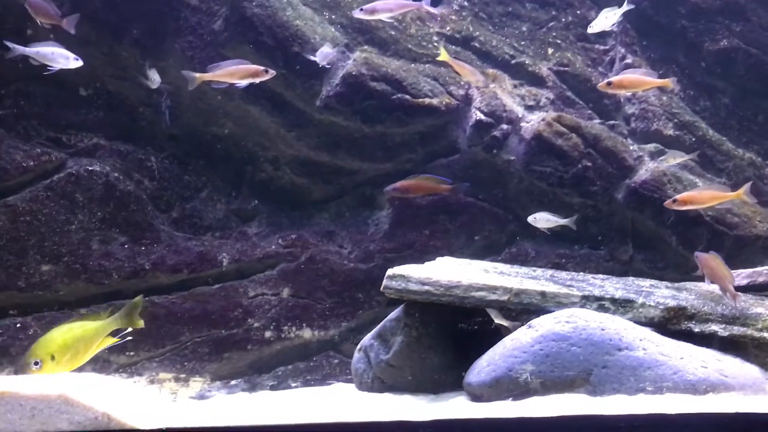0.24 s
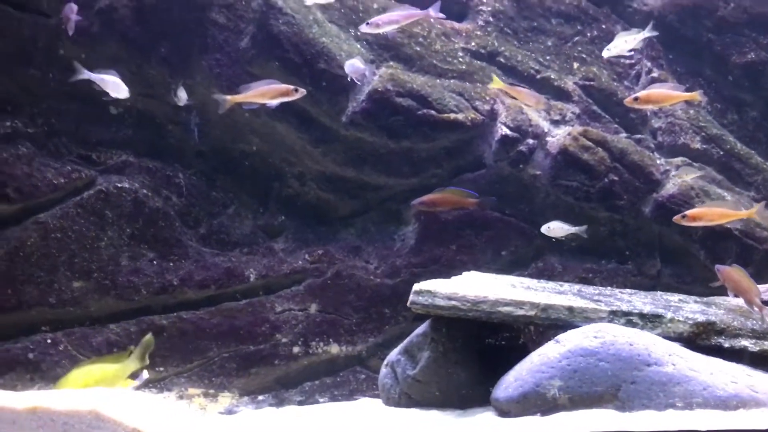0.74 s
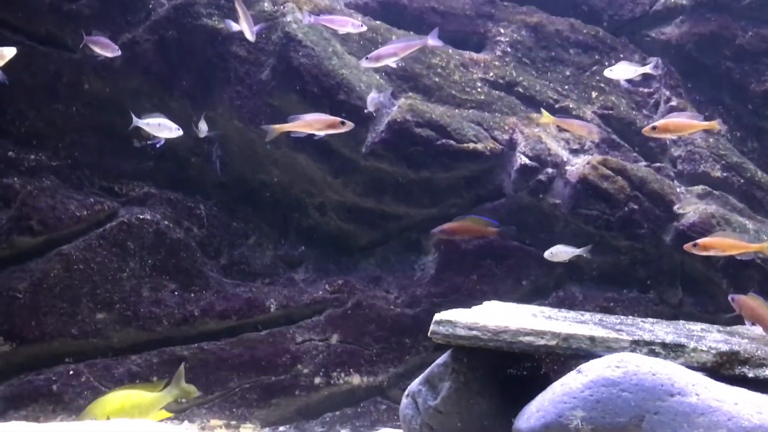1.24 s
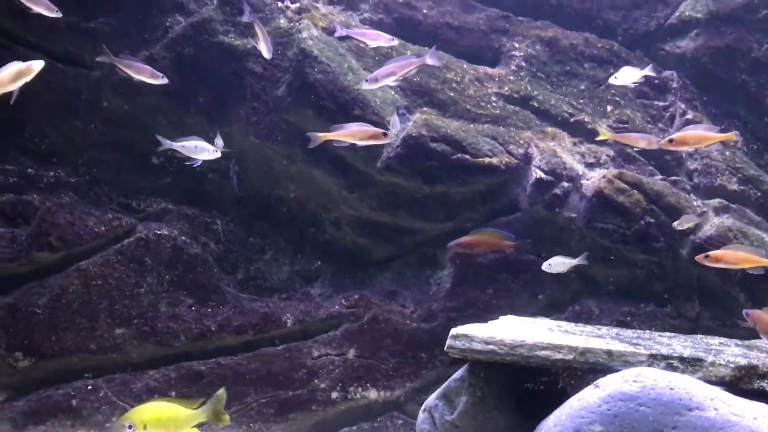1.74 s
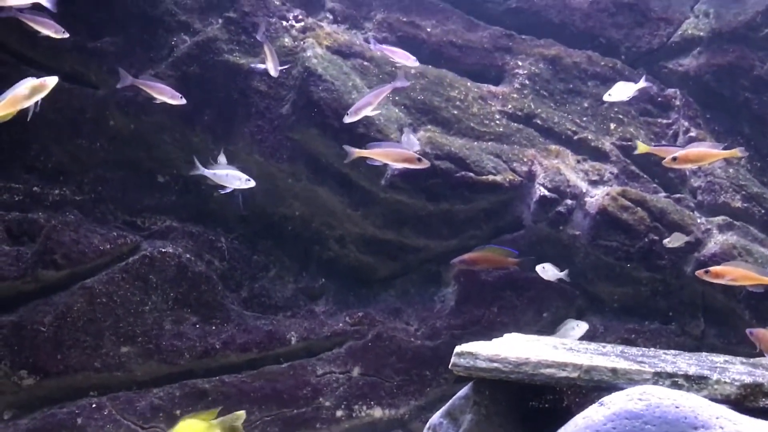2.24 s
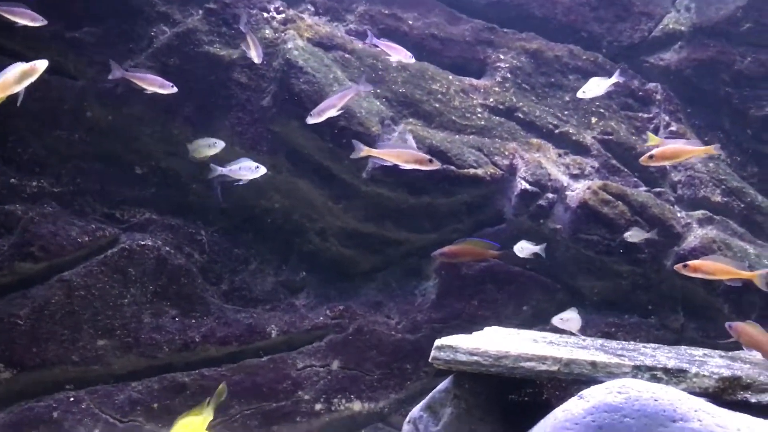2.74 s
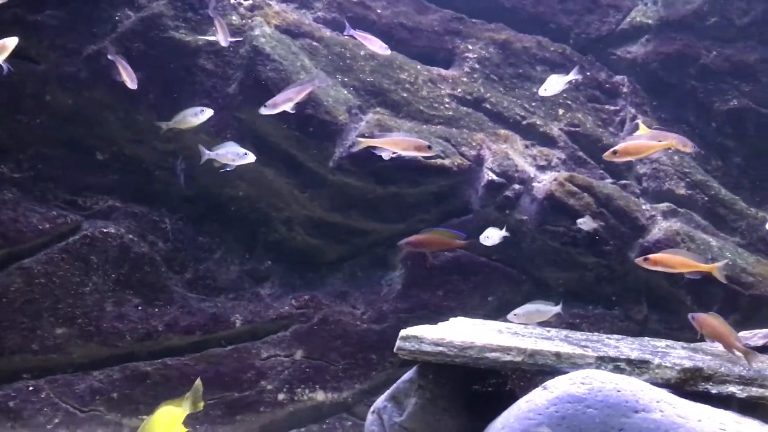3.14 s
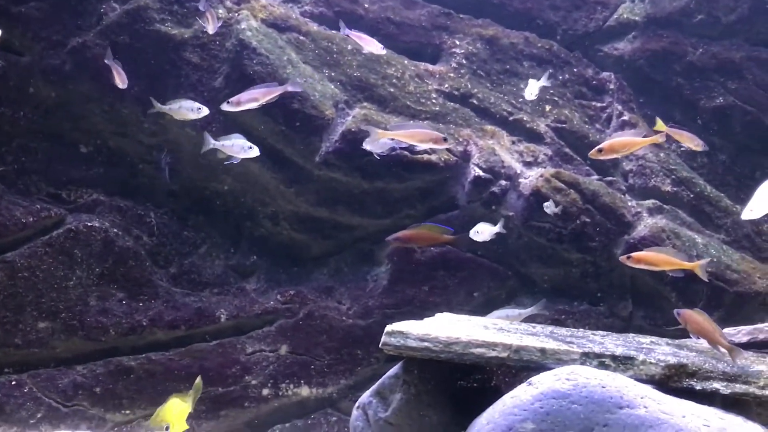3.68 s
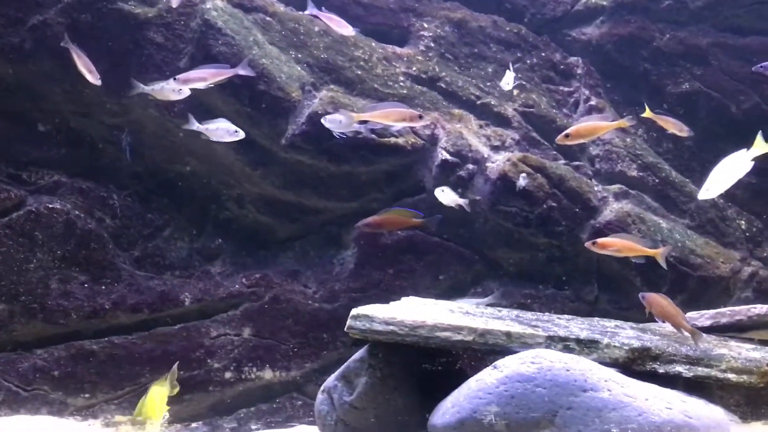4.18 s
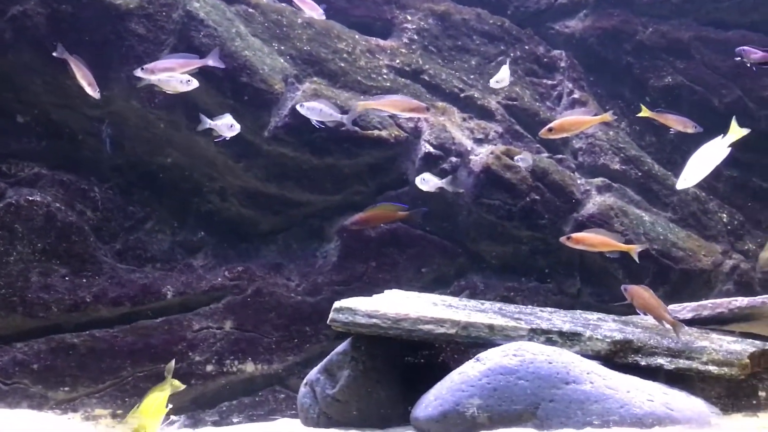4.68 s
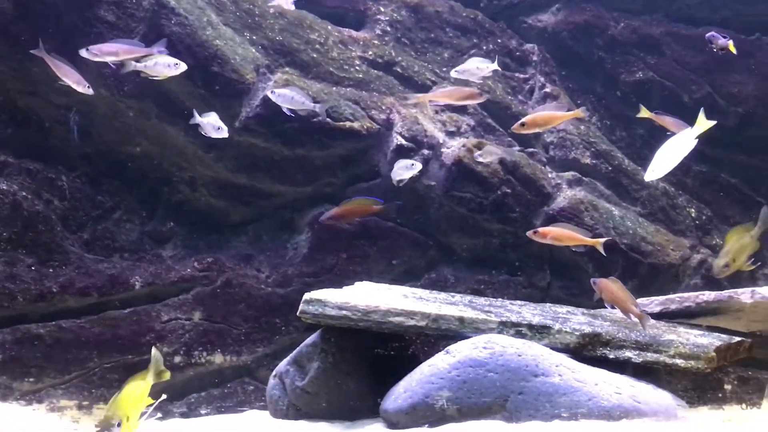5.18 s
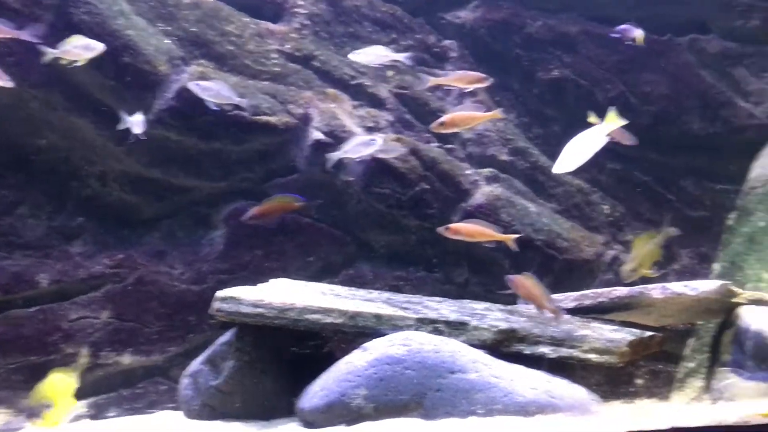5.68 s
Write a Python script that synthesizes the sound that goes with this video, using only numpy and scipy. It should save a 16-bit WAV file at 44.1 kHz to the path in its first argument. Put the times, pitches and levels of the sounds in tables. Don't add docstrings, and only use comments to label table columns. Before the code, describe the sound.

A close mono indoor sound of a fish tank, continuous from start to end. A deep, steady 50-hertz pump hum is the strongest layer, with a faint drone and cabinet resonance. Above it, filter water makes a quiet fizzing hiss, slightly stronger around 0.5 seconds and gently wavering afterwards. Irregular bubble ticks and high plinks dot it, with bright ones near 1.1 seconds and a busy cluster from 2.5 to 3.1, the sharpest at 2.9. Drops slap the surface at about 0.1, 1.7, 2.6, 3.0 and, most clearly, 4.4 to 4.5 seconds, with lower plinks around the last. Soft gurgles bunch between 0.5 and 3 seconds, then thin out, returning near 4, 5 and 5.8. A faint hollow pipe note swells now and then, notably near 1.4. Low shudders around 0.7, 3, 4.1, 5 and 5.9 make the hum sag briefly. Short, glassy echoes surround the water.

```python
import sys
import numpy as np
from scipy import signal
from scipy.fft import rfft, irfft
from scipy.io import wavfile
from scipy.ndimage import uniform_filter1d

SR = 44100
rng = np.random.default_rng(int(sys.argv[2]) if len(sys.argv) > 2 else 0)


def transcribe(u):
    v = np.clip(np.atleast_2d(u).T, -1, 1)
    q = np.round(v * 32767).astype(np.int16)
    wavfile.write(sys.argv[1], SR, q)


def how_loud(loudness_db):
    steps = np.asarray(loudness_db, float) / 20
    return 10 ** steps


N = 261072

# (frequency [Hz], density [dB/Hz])
WATER_SPECTRUM = [(760, -12), (1300, -11.5), (1430, -15), (1830, -8), (2400, -7.5), (2660, -10.5),
                  (3080, -12.5), (3630, -9), (4860, -10.5), (5280, -7.5), (7510, -12.5), (9250, -12),
                  (10500, -17), (12600, -17.5), (15500, -21)]
# (frequency [Hz], width [Hz], gain [dB])
HOOD_MODES = [(1920, 28, -0.5), (2210, 110, -1.5), (2364, 71, 5), (2846, 99, -0.5), (3630, 50, -27),
              (5250, 73, 1), (5430, 100, -2), (6180, 380, -2)]
# (time [s], fizz level [dB])
FLOW = [(0, 1.1), (.55, 3.5), (.8, 1.9), (1.1, 2.7), (2.1, 1.8), (2.4, 2.8), (2.95, 2), (3.4, 1.5),
        (3.9, 2.5), (4.3, 1.5), (5.2, 2.4), (5.92, 0.5)]
# (time [s], level [dB], pitch [Hz])
PLINKS = [(0.475, -60, 1680), (.5079, -65, 1700), (.6825, -65, 3360), (0.7856, -61.5, 2440),
          (1.1134, -65, 2080), (1.6365, -68, 3630), (1.6735, -64, 2140), (1.6806, -69, 3570),
          (1.9365, -65, 2200), (2.2613, -67, 2460), (2.953, -62, 3800), (2.9748, -67, 2930),
          (3.017, -51, 3750), (3.1299, -58, 2260), (3.5157, -60, 4390), (3.535, -64, 2420),
          (3.9819, -65, 2410), (4.2297, -61, 3380), (4.2426, -69, 1880), (4.412, -57, 2320),
          (4.5, -58, 2050), (4.5053, -61, 2900), (4.5215, -56, 2250), (4.563, -64, 1300),
          (5.126, -63.5, 3400), (5.161, -64, 1400), (5.3383, -63, 2340), (5.4085, -66, 3450),
          (5.5737, -67, 1970), (5.8594, -66, 1910)]
# (time [s], level [dB], pitch [Hz])
TICKS = [(.1089, -64, 4970), (.435, -53, 5250), (0.5733, -53, 5560), (0.7714, -58, 6370),
         (.8208, -59, 6290), (.9106, -55, 7580), (1.0323, -50, 7000), (1.128, -48, 7000),
         (1.4607, -54, 6400), (1.6371, -62, 6290), (1.839, -58, 7060), (2.4017, -58, 6100),
         (2.5107, -53, 7580), (2.609, -56, 5450), (2.7206, -58, 6240), (2.7385, -58, 6510),
         (2.7706, -58, 7150), (2.896, -52, 6030), (2.9127, -62, 6280), (3.037, -62, 5250),
         (3.6229, -55, 6160), (3.6545, -51, 5440), (3.6813, -53, 5500), (3.74, -58, 5250),
         (3.9869, -65, 4980), (4.196, -51, 5460), (4.41, -59, 6100), (5.0265, -59, 4910),
         (5.627, -54, 5250)]
# (time [s], level [dB], pitch [Hz])
PRICKS = [(.1187, -66, 8870), (.1808, -66, 8870), (.351, -66, 9900), (.5329, -63, 9550), (.805, -58, 8610),
          (.9231, -63, 10250), (1.2938, -52, 9100), (1.5353, -60, 9900), (1.6364, -58, 9300),
          (1.704, -59, 10000), (2.0159, -66, 11540), (2.0452, -65, 9260), (2.232, -53, 9650),
          (2.6087, -54, 9000), (2.6651, -51, 9650), (2.7059, -64, 11890), (2.8942, -42, 8500),
          (2.9307, -54, 9730), (3.0146, -49, 7900), (3.261, -52, 9650), (3.2774, -62, 8800),
          (3.4591, -61, 8060), (3.521, -50, 9600), (3.6208, -56, 8350), (3.956, -58, 9600),
          (4.2112, -73, 11100), (4.8077, -65, 8010), (5.0934, -73, 10160), (5.1582, -63, 8600),
          (5.5346, -52, 9400)]
# (time [s], level [dB], pitch [Hz])
SPRAY = [(0.1087, -57, 12700), (0.2877, -64, 12500), (0.7427, -64, 12500), (0.8629, -61, 11700),
         (0.9822, -60, 11200), (1.4107, -59, 11300), (1.5349, -63, 11700), (1.6362, -57, 13100),
         (1.6806, -59, 11400), (1.7689, -62, 11700), (2.0148, -59, 13200), (2.0448, -61, 13300),
         (2.5097, -63, 11700), (2.608, -67, 11400), (2.7053, -62, 10900), (2.7377, -60, 12000),
         (2.7566, -60, 12000), (2.9053, -62, 11300), (2.9811, -64, 11700), (3.0525, -61, 12000),
         (3.5204, -64, 11500), (3.8092, -62, 11200), (4.2103, -66, 11200), (4.3211, -64, 11900),
         (4.4109, -55, 12800), (4.556, -62, 10900), (4.8294, -63, 12200), (5.3163, -63, 11700)]
# (time [s], level [dB], treble minus body [dB])
SLAPS = [(0.1099, -50.5, -15.5), (0.121, -64, -5), (0.6705, -63, -2), (0.785, -56, -9), (1.6386, -54, -11),
         (1.681, -43, -27), (2.0163, -62, -2), (2.611, -50, -14), (2.771, -61.5, -2.5), (3.0177, -46, -19),
         (4.4125, -43, -19), (4.4197, -52, -16), (4.5217, -43.5, -26)]
# (time [s], level [dB], pitch [Hz])
GURGLES = [(0.582, -54, 258), (0.824, -57, 345), (0.855, -60, 935), (0.98, -56.5, 661), (0.995, -52.5, 205),
           (1.43, -52, 165), (1.613, -51, 169), (1.733, -52.5, 174), (1.761, -56, 332), (1.857, -57, 650),
           (2.366, -55.5, 344), (2.55, -59, 880), (2.616, -54, 256), (2.771, -57.5, 925), (2.874, -54, 311),
           (2.977, -58, 166), (2.977, -51, 237), (3.84, -58.5, 894), (3.972, -53.5, 162),
           (4.053, -60.5, 932), (5.306, -61, 976), (.3, -57, 278), (1.46, -62, 575), (1.57, -56, 575),
           (2.01, -57, 580), (2.14, -60, 590), (3.77, -59, 191), (4.99, -52, 150), (5.8, -58, 150),
           (5.815, -58, 757)]
# (multiple of mains [1], level re fundamental [dB])
OVERTONES = [(2, -15.5), (3, -27), (4, -43.5), (6, -32), (8, -44), (10, -42), (11, -35), (15, -36.5)]
# (frequency [Hz], width [Hz], level [dB])
CABINET_MODES = [(320, 9.8, -68), (383, 15.4, -71.5), (587, 23, -66.5), (650, 39, -67.5), (880, 58, -88),
                 (1125, 54, -74), (944, 49, -80.5), (1319, 19, -75.5)]
# (frequency [Hz], density [dB/Hz])
DRONE_SPECTRUM = [(30, -5), (60, -4.5), (150, -13.5), (260, -3), (395, -7), (420, -11.5), (520, -10),
                  (600, -8), (780, -11), (900, -7.5), (1350, -15.5), (1450, -16), (2500, -25.5),
                  (5000, -28.5), (12000, -85)]
# (time [s], level [dB])
PIPE_SWELLS = [(0.0, -60), (.76, -60), (.95, -64), (1.29, -65), (1.36, -57), (1.58, -61), (1.93, -66),
               (2.14, -69), (2.43, -67), (3.05, -64.5), (3.36, -62), (3.6, -60), (4.0, -63.5), (4.12, -66),
               (4.6, -66), (4.71, -66), (4.86, -63), (5.24, -72), (5.39, -71), (5.92, -60)]
# (time [s], level [dB], half length [s])
SHUDDERS = [(0.0, -62, 0.037), (.18, -57, .09), (.7, -47.5, 0.2), (.95, -52, 0.1), (1.35, -54, .06),
            (1.47, -57, .04), (1.61, -51.5, 0.034), (1.73, -52, .025), (1.92, -58, 0.11), (2.3, -54, 0.28),
            (2.69, -50, 0.076), (2.97, -48.5, 0.066), (3.2, -53, 0.069), (4.06, -48, 0.13), (4.6, -50, .08),
            (5.02, -46.5, 0.11), (5.43, -52.5, 0.23), (5.87, -47, 0.12)]
# (frequency [Hz], density [dB/Hz])
DEEP_SPECTRUM = [(22, -56), (40, -5.5), (65, 7), (92, 2.5), (130, -4), (200, -26), (300, -39), (900, -93)]
# (frequency [Hz], density [dB/Hz])
BURBLE_SPECTRUM = [(80, -18), (115, -4), (160, 5.5), (260, -1.5), (350, -19), (900, -88)]
# (frequency [Hz], width [Hz], depth [0-1])
MIC_DIP = (10220, 400, 0.36)

MAINS_HZ, HUM_DB, SAG_DB = 50.02, -36.5, 4.5
DRONE_DB, TREMOR_DB = -57, -58.5
PIPE_HZ, PIPE_REST_DB, PIPE_SWELL_S = 716, -72.5, 0.063
RING_HZ, RING_HZ_PER_KHZ = 39.7, 44.6
BURST_SHARE = 0.56
STRAY_COUNT, STRAY_DB, STRAY_SPREAD_DB = 70, -72.5, 2
SPRAY_DB, SPRAY_WIDTH_HZ = 12, 1600


def evened(x):
    return x / np.sqrt(np.mean(x ** 2) + 1e-20)


def curve(rows):
    return np.interp(np.arange(N) / SR, *np.transpose(rows))


def colour(x, points):
    point_hz, point_db = np.transpose(points)
    hz = np.fft.rfftfreq(len(x), 1 / SR)
    gain_db = np.interp(np.log(hz + 1), np.log(point_hz + 1), point_db)
    return irfft(rfft(x) * how_loud(gain_db), len(x))


def resonate(x, hz, width_hz):
    turn = np.exp(2j * np.pi * hz * np.arange(len(x)) / SR)
    r = np.exp(-np.pi * width_hz / SR)
    return 2 * (turn * signal.lfilter([1 - r], [1, -r], x / turn)).real


def add(mix, at_s, sound):
    part = mix[round(at_s * SR):][:len(sound)]
    part += sound[:len(part)]


def swells(rows, rest_db):
    t = np.arange(0, N, 64) / SR
    power = how_loud(2 * rest_db)
    for at_s, db, half_s in rows:
        power = power + how_loud(2 * db) * np.exp(-2 * ((t - at_s) / half_s) ** 2)
    return np.interp(np.arange(N) / SR, t, 10 * np.log10(power))


def plink(hz, width_hz, rise=.03, start_s=.0004):
    t = np.arange(1600) / SR
    fade = np.exp(-np.pi * width_hz * t)
    turns = np.cumsum(hz * (1 + rise * (.5 - fade))) / SR
    return (1 - np.exp(-t / start_s)) * fade * np.sin(2 * np.pi * turns)


def tank(x, t60_s=.09):
    taps = np.zeros(6000)
    at = np.arange(160, 5980, 20) + rng.integers(0, 20, 291)
    taps[at] = rng.choice([-1., 1.], len(at)) * how_loud(-60 * at / SR / t60_s)
    taps /= np.linalg.norm(taps)
    taps[round(.0052 * SR)] += .5
    taps[round(.009 * SR)] -= .4
    return signal.oaconvolve(x, taps)[:N]


def fizz(per_s=1500, spread_db=1.5, cycles=5.7):
    clumps = how_loud(4.0 * evened(uniform_filter1d(rng.standard_normal(N), 1000)))
    born = rng.random(N) < per_s * clumps / SR
    size = how_loud(spread_db * np.minimum(rng.exponential(1, N), 3.5)) * born
    pitches_hz = np.linspace(1500, 14500, 44)
    which = rng.integers(0, len(pitches_hz), N)
    swarm = np.zeros(N)
    for k, hz in enumerate(pitches_hz):
        width_hz = hz / cycles * rng.uniform(0.14, 1.0)
        grain = evened(plink(hz, width_hz)[:500])
        swarm += signal.oaconvolve(size * (which == k), grain)[:N]
    return evened(swarm)


def stream():
    flow_db = curve(FLOW) - np.mean(curve(FLOW))
    bubbles = how_loud(2.0 * flow_db) * fizz()
    hiss = how_loud(.5 * flow_db) * rng.standard_normal(N)
    raw = hiss + how_loud(-2.0) * bubbles + how_loud(-7.5) * tank(bubbles)
    hooded = raw + sum(how_loud(db) * resonate(raw, hz, width_hz) for hz, width_hz, db in HOOD_MODES)
    return how_loud(-64.5) * evened(colour(hooded, WATER_SPECTRUM))


def single_bubbles():
    out = np.zeros(N)
    strays = [(a * N / SR, STRAY_DB + 2 * STRAY_SPREAD_DB * (b - .5), 2400 + 8000 * c)
              for a, b, c in rng.random((STRAY_COUNT, 3))]
    for at_s, db, hz in PLINKS + TICKS + PRICKS + strays:
        calm_hz = RING_HZ + RING_HZ_PER_KHZ * hz / 1000
        width_hz = calm_hz * how_loud(BURST_SHARE * max(db + 60.5, -8))
        add(out, at_s, how_loud(db + 13.5) * plink(hz, width_hz))
    for at_s, db, hz in SPRAY:
        add(out, at_s, how_loud(db + SPRAY_DB) * plink(hz, SPRAY_WIDTH_HZ, start_s=.0001))
    return out


def slaps():
    out = np.zeros(N)
    t = np.arange(300) / SR
    for at_s, db, treble_db in SLAPS:
        spectrum = [(900, -35), (1800, -19.5), (6500, -17.5), (7500, treble_db + 1.5),
                    (9800, treble_db - 1), (10600, treble_db - 16), (13000, treble_db - 5),
                    (16500, treble_db - 30)]
        burst = rng.standard_normal(300) * np.exp(-abs(t - .002) / .0008)
        add(out, at_s - .002, how_loud(db + 17.5) * colour(burst, spectrum))
    return out


def gurgles(length_s=.06):
    out = np.zeros(N)
    t = np.arange(0, length_s, 1 / SR)
    for at_s, db, hz in GURGLES:
        glide_hz = hz * (1 + 0.027 * (t / length_s - .5))
        tone = np.hanning(len(t)) * np.sin(2 * np.pi * np.cumsum(glide_hz) / SR)
        add(out, at_s - length_s / 2, how_loud(db + 3.0) * tone)
    return out


def pipe_note():
    wobble_hz = 4.02 * evened(uniform_filter1d(rng.standard_normal(N), 3000))
    level_db = swells([(at_s, db, PIPE_SWELL_S) for at_s, db in PIPE_SWELLS], PIPE_REST_DB)
    tone = np.sin(2 * np.pi * np.cumsum(PIPE_HZ + wobble_hz) / SR)
    return np.sqrt(2) * how_loud(level_db) * tone


def pump_hum():
    turn = 2 * np.pi * MAINS_HZ * np.arange(N) / SR - .5
    hum = np.cos(turn)
    for k, db in OVERTONES:
        hum += how_loud(db) * (-1) ** (k + 1) * np.cos(k * turn)
    sag_db = SAG_DB * how_loud(swells(SHUDDERS, TREMOR_DB) + 41.5)
    return np.sqrt(2) * how_loud(HUM_DB - sag_db) * hum


def pump_noise():
    out = how_loud(DRONE_DB) * evened(colour(rng.standard_normal(N), DRONE_SPECTRUM))
    shake = rng.standard_normal(N)
    for hz, width_hz, db in CABINET_MODES:
        ring = resonate(resonate(shake, hz, width_hz), hz, width_hz)
        out += how_loud(db) * evened(ring)
    return out


def stand_shudder():
    deep = evened(colour(rng.standard_normal(N), DEEP_SPECTRUM))
    burble = evened(colour(rng.standard_normal(N), BURBLE_SPECTRUM))
    swell_db = swells(SHUDDERS, TREMOR_DB)
    return how_loud(swell_db) * deep + how_loud(0.16 * (swell_db + 64.0) - 63.5) * burble


def scene():
    drops = single_bubbles() + slaps()
    water = stream() + drops + how_loud(-3) * tank(drops) + gurgles()
    machine = pipe_note() + pump_hum() + pump_noise()
    return (water + machine + stand_shudder())[None]


def roll_off(x):
    return signal.sosfilt(signal.butter(12, 15690, fs=SR, output="sos"), x)


def record(dry):
    hz, width_hz, depth = MIC_DIP
    dipped = dry - depth * resonate(dry[0], hz, width_hz)
    lowpass = signal.firwin(511, 15780, window=("kaiser", 9), fs=SR)
    mix = signal.oaconvolve(dipped, lowpass[None], "same")
    return roll_off(mix)


dry = scene()
out = record(dry)
transcribe(out)
```